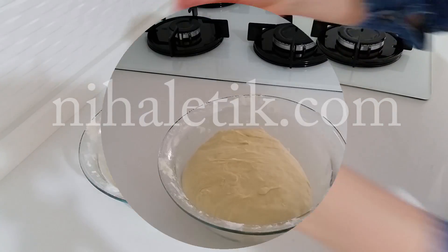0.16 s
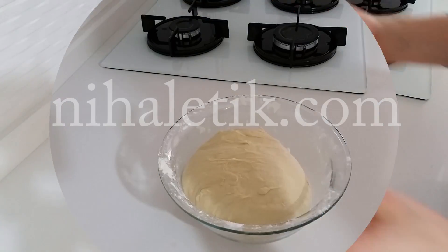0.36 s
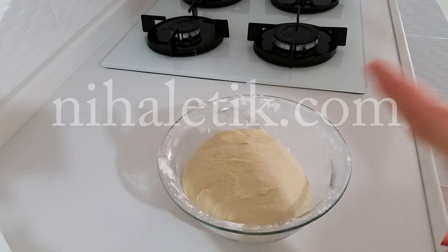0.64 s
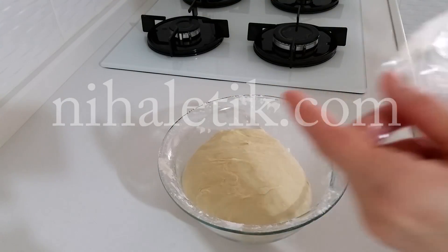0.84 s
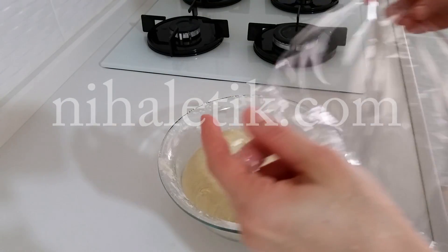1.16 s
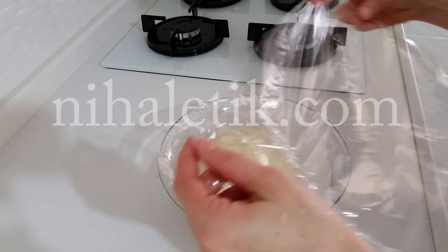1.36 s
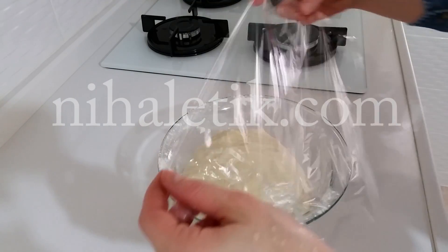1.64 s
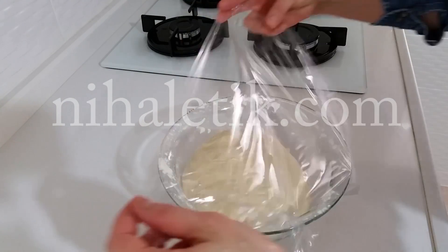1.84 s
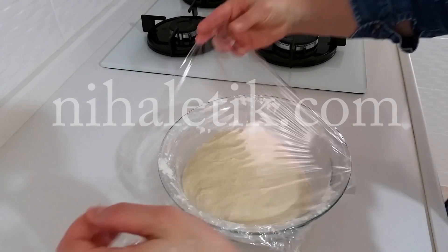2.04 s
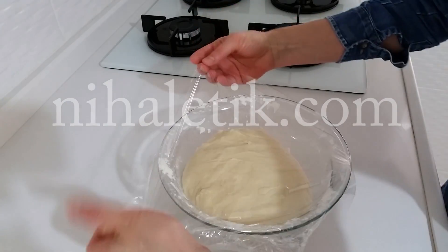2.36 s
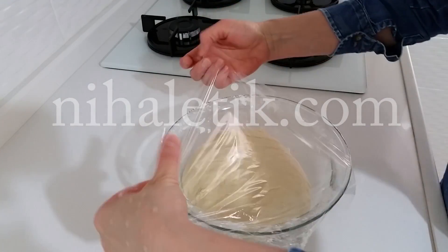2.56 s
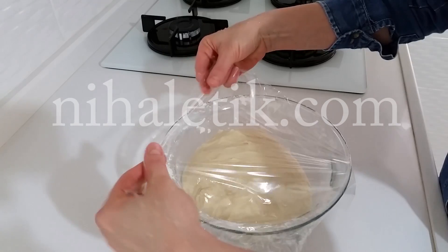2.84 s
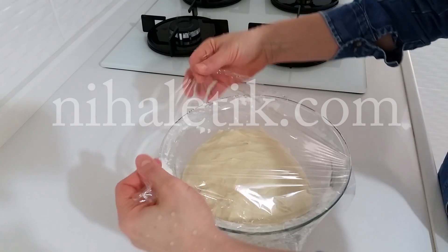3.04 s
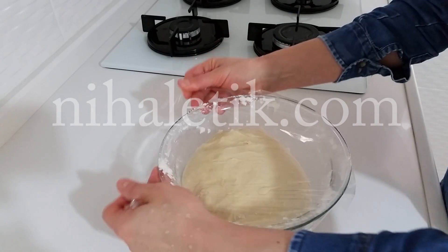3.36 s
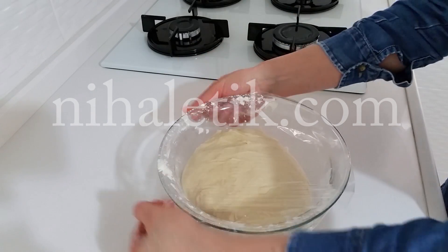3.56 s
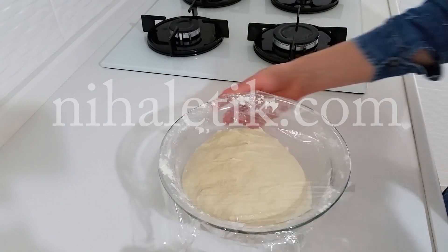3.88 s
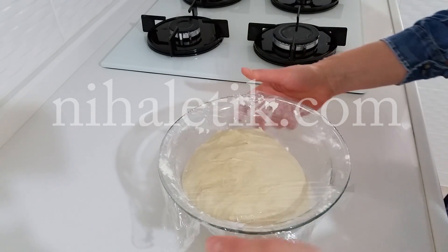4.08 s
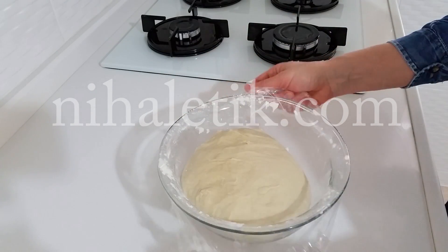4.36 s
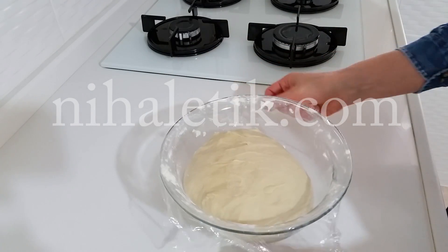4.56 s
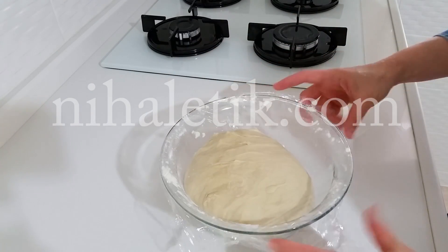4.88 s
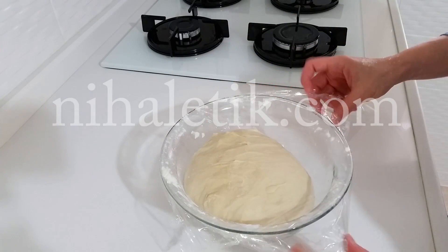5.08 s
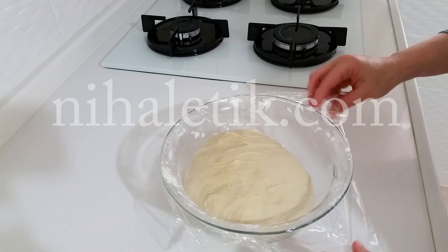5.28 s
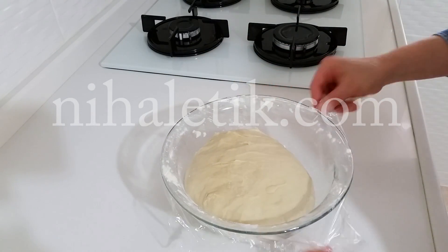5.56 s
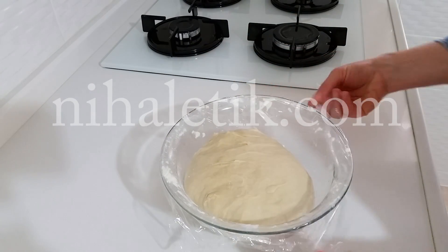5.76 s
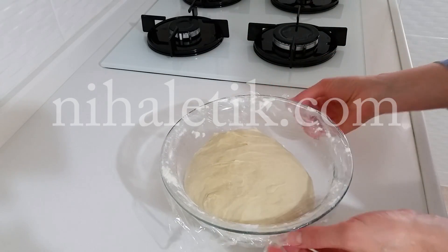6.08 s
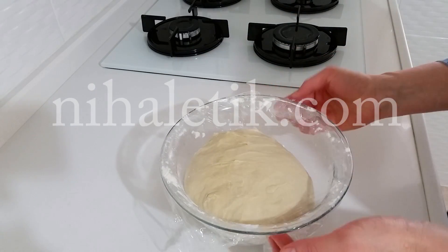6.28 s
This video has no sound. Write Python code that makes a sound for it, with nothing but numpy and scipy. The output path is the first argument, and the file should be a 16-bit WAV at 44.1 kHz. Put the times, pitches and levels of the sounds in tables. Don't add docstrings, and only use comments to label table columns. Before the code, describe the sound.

Plastic film crackles faintly, then snaps and pops sharply in bursts as hands stretch and press it over a glass bowl, above a low appliance hum.

```python
import sys
import numpy as np
from scipy import signal
from scipy.io import wavfile
from scipy.ndimage import uniform_filter1d

SR = 44100
rng = np.random.default_rng(int(sys.argv[2]) if len(sys.argv) > 2 else 0)


def bounce(signal):
    frames = np.transpose(np.atleast_2d(signal))
    limited = np.clip(frames, -1, 1)
    pcm = np.round(limited * 32767).astype(np.int16)
    wavfile.write(sys.argv[1], SR, pcm)


def to_linear_factor(level_db):
    exponent = np.asarray(level_db, float) / 20
    return 10 ** exponent


N = 283122
TAPS = 1024

# time in seconds, gain in dB.
ROOM_GAIN = [
    (0.0, -0.5),
    (0.68, -2.5),
    (2.27, 3),
    (3.2, 0.5),
    (3.84, 4.5),
    (4.08, -0.5),
    (4.5, 3.5),
    (4.95, 1.5),
    (5.29, 4),
    (6.42, 3.5),
]
# frequency in Hz, likeness (1 is identical).
LIKENESS = [(60, 1), (180, 0.68), (380, 0.73), (700, 0.12), (1650, 0.0076), (4970, 0.014), (15000, 0.028)]


def evened(x):
    return x / np.sqrt(np.mean(x ** 2) + 1e-20)


def read(points, hz):
    f, *columns = np.transpose(points)
    return np.array([np.interp(np.log(hz + 1), np.log(f + 1), c) for c in columns])


def along(rows):
    s, *columns = np.transpose(rows)
    return [np.interp(np.arange(N) / SR, s, c) for c in columns]


def add(mix, s, sound):
    part = mix[..., round(s * SR):][..., :sound.shape[-1]]
    part += sound[..., :part.shape[-1]]


def sides(pan_db):
    return to_linear_factor(np.array([pan_db / 2, -pan_db / 2]))


def causal(db):
    log_gain = np.log(to_linear_factor(np.maximum(db - db.max(), -100)))
    circle = np.concatenate([log_gain, log_gain[:, -2:0:-1]], axis=1)
    spectrum = np.exp(np.conj(signal.hilbert(circle, axis=1)))
    taps = np.fft.ifft(spectrum, axis=1).real[:, :TAPS]
    return 2 * taps / np.linalg.norm(taps)


def film_colours():
    # frequency in Hz, left level in dB, right level in dB.
    film = [(236, -72.5, -67), (497, -70.5, -82), (900, -69.5, -75), (1810, -73.5, -79), (3560, -74, -78),
            (4200, -72, -77), (5650, -86, -85.5), (6280, -89.5, -85.5), (7440, -90.5, -102),
            (8740, -75.5, -102), (10400, -72.5, -83), (13300, -76, -73.5), (14500, -78, -65.5),
            (15500, -78.5, -67.5)]
    # frequency in Hz, width in Hz, level in dB.
    hollow = [(535, 165, 2.5), (860, 76, 9), (1280, 140, -6), (1920, 190, -20), (2700, 330, -6)]
    hz = np.fft.rfftfreq(4 * TAPS, 1 / SR)
    octaves = np.log2((hz + 1) / 7200)
    colour_db = read(film, hz)
    treble_db = colour_db + 36 * np.minimum(octaves, 0)
    treble_db -= 400 * np.maximum(np.log2((hz + 1) / 16000), 0)
    body_db = colour_db - 40 * np.maximum(octaves, 0)
    body_db += 18 * np.minimum(np.log2((hz + 1) / 260), 0)
    body_db += 5.35 * sum(to_linear_factor(db / 2) / (1 + ((hz - f) / w) ** 2) for f, w, db in hollow)
    return causal(treble_db), causal(body_db)


def hands():
    # start in seconds, hold in seconds, crackle in dB,
    # rubbing on the bowl in dB above the crackle, left-right difference in dB.
    strokes = [(0.0, 0.2, -90, -15, -21), (0.87, 0.87, -80, -5.5, -7), (1.535, 0.29, -60, -13, -3.5),
               (1.998, 0.26, -54.5, -17, -1.5), (2.288, 0.73, -64, -12, 2.5),
               (2.867, 0.92, -64, -6.5, -0.5), (3.43, 0.2, -56.5, -15, 1.5), (3.987, 0.17, -72, 0, -2),
               (4.238, 0.1, -54.5, -10.5, -1), (4.467, .04, -46.5, -20, 3), (4.755, 0.18, -74, 4.5, -1),
               (4.93, 0.15, -54.5, -10, 0.5), (5.078, 0.07, -65, -9, 1), (5.23, 0.057, -48, -12, 2),
               (5.45, 0.42, -51, -14.5, 2), (5.652, 0.068, -41.5, -14, 1), (5.793, 0.15, -43.5, -13.5, 5.5),
               (5.904, 0.042, -52, -19, 3), (6.015, 0.48, -51.5, -13, 2)]
    # start in seconds, hold in seconds,
    # crackle in dB, rubbing in dB above the crackle, left-right difference in dB.
    slips = [(1.743, 0.061, -53.5, -16, 6), (3.692, 0.062, -44.5, -12.5, 2.5), (3.74, 0.026, -49.5, -28, 8),
             (3.81, 0.056, -36.5, -11, 7.5), (4.316, 0.14, -42.5, -10, 4.5), (4.503, 0.017, -45, -19, 4),
             (4.55, 0.074, -38, -10, 4.5), (4.716, 0.025, -49, -17, 3), (4.956, 0.022, -69, -3, -7),
             (5.07, 0.024, -48, -11, 4.5), (5.296, .02, -62, -14, -4), (6.298, 0.026, -46.5, -15.5, 6),
             (6.353, 0.031, -50.5, -19, -1), (2.313, 0.039, -66, -13.5, 0), (2.853, 0.026, -64, -24, 0),
             (2.111, 0.027, -49, -10, 9), (2.517, 0.02, -56.5, -15, 6), (3.019, 0.022, -53.5, -12, 3),
             (5.334, 0.077, -42, -15, 5)]
    start, hold, crackle_db, rub_db, pan_db = np.transpose([*strokes, *slips])[..., None]
    rise = np.repeat([188, 6000], [len(strokes), len(slips)])[:, None]
    fall = 194
    t = np.arange(0, N / SR + .01, .002)
    slope_db = np.maximum(rise * (start - t), fall * (t - start - hold))
    power = to_linear_factor(2 * (crackle_db - np.maximum(slope_db, 0))) + 1e-14
    total = power.sum(0)
    rub = (power * to_linear_factor(2 * rub_db)).sum(0)
    pan = (power * pan_db).sum(0) / total
    return along(np.transpose([t, 10 * np.log10(total), 10 * np.log10(rub), pan]))


def creases():
    # time in seconds, peak in dB, left-right difference in dB, length in ms.
    stiff = [(1.5205, -36, -3, 0.87), (1.7427, -24, 0, 0.5), (1.7551, -25, -6, 0.77),
             (1.9838, -35, -6, 0.88), (2.0683, -31, 1, 0.55), (2.1233, -28, -10, 0.56),
             (2.1311, -26, -4, 1.0), (2.3172, -32, -1, 0.79), (2.6817, -35, -3, 0.72),
             (2.8537, -31, -6, 0.73), (3.021, -29, -2, 2.5), (3.0231, -26, -8, 1.04),
             (3.2786, -41, -4, 0.94), (3.613, -33, 0, 1.25), (3.6752, -15, -1, 0.6), (3.6789, -26, -1, 2.5),
             (3.7452, -23, -1, 1.22), (3.7484, -24, 0, 1.15), (3.7936, -27, 10, 0.81),
             (3.8089, -21, 6, 2.5), (3.8114, -10, -4, 0.87), (3.8137, -19, 5, 2.5), (3.8781, -23, 4, 0.99),
             (4.3219, -30, -7, 1.23), (4.3365, -28, -10, 1.0), (4.3553, -22, -1, 1.08),
             (4.381, -18, -6, 1.72), (4.4188, -26, 7, 1.05), (4.4961, -27, 3, 0.57),
             (4.5512, -13, -9, 0.68), (4.5709, -21, -4, 0.84), (4.6431, -26, -11, 0.52),
             (4.7325, -30, -8, 2.5), (4.735, -20, -8, 0.81), (4.7379, -24, -2, 2.5),
             (4.9015, -34, -7, 0.69), (4.9683, -23, -8, 0.48), (5.0842, -23, -3, 0.67),
             (5.1097, -31, -12, 0.55), (5.2213, -28, 2, 1.25), (5.3036, -22, -8, 0.66),
             (5.3458, -24, -1, 0.94), (5.3543, -26, -8, 0.79), (5.5841, -31, -6, 0.52),
             (5.5969, -31, -5, 0.73), (5.6778, -19, 3, 0.51), (5.6969, -21, 7, 0.92),
             (5.8232, -30, -13, 0.62), (5.9276, -25, -2, 0.84), (5.9499, -30, -12, 0.62)]
    # time
    # in seconds, peak in dB, left-right difference in dB.
    ticks = [(0.8599, -53, -11), (0.8673, -49, -12), (1.0196, -57, -12), (1.0515, -56, -9),
             (1.2399, -53, -1), (1.3623, -59, -9), (1.3733, -55, -1), (1.3919, -53, 0), (1.3978, -54, -7),
             (1.4123, -50, -2), (1.4821, -54, -9), (1.523, -41, -1), (1.565, -43, -6), (1.5851, -38, -4),
             (1.5958, -43, -5), (1.6791, -42, -6), (1.6924, -42, -2), (1.7575, -31, 3), (1.7718, -33, -2),
             (1.774, -33, 1), (1.8721, -44, 6), (1.9739, -45, 1), (2.0109, -39, -7), (2.1025, -35, -4),
             (2.1339, -29, 1), (2.1506, -35, 12), (2.179, -34, -4), (2.227, -37, -3), (2.2906, -40, -7),
             (2.3205, -41, -3), (2.5288, -36, 3), (2.5308, -38, 6), (2.6219, -40, -1), (2.6418, -37, -7),
             (2.6859, -44, -6), (2.8048, -45, 5), (2.8558, -39, -1), (2.9316, -46, -4), (2.9898, -42, -9),
             (3.0167, -36, -3), (3.0255, -32, 0), (3.2424, -46, -4), (3.3156, -38, 3), (3.3185, -41, -5),
             (3.3806, -36, 2), (3.4658, -44, -5), (3.4801, -39, -3), (3.6153, -40, 5), (3.6825, -29, -3),
             (3.724, -31, -1), (3.7541, -27, -2), (3.7588, -30, -3), (3.7965, -34, 9), (3.8186, -20, -2),
             (3.8803, -28, 6), (4.2809, -36, -6), (4.3343, -30, -5), (4.3391, -31, -1), (4.3501, -28, -2),
             (4.384, -25, -3),
             (4.3871, -26, 1), (4.4209, -27, -6), (4.4448, -29, 1), (4.4843, -32, -2), (4.5126, -28, 6),
             (4.5212, -28, 0), (4.5533, -26, 1), (4.5559, -26, -6), (4.5761, -25, 3), (4.6304, -27, -8),
             (4.7404, -30, 4), (4.744, -34, -10), (4.966, -34, -8), (5.0208, -43, -9), (5.0334, -39, -5),
             (5.0626, -39, -6), (5.0807, -34, -8), (5.0934, -32, -10), (5.1908, -39, -7), (5.2031, -36, -5),
             (5.2087, -38, -8), (5.2256, -34, -3), (5.2279, -31, 0), (5.2477, -32, 3), (5.2729, -33, -6),
             (5.3057, -33, -1), (5.348, -30, 4), (5.3984, -34, 8), (5.4122, -30, -7), (5.4165, -33, 4),
             (5.4417, -33, -9), (5.5, -38, -10), (5.5035, -35, -7), (5.5286, -35, -3), (5.5494, -36, -4),
             (5.567, -37, -6), (5.6239, -32, -9), (5.669, -28, -5), (5.6741, -28, -4), (5.684, -25, -4),
             (5.6862, -28, -9), (5.691, -26, -3), (5.6992, -25, 2), (5.7035, -26, -4), (5.7097, -28, -3),
             (5.8057, -33, -6), (5.8134, -31, -13), (5.8344, -27, -1), (5.8569, -27, -3), (5.9298, -28, 0),
             (5.9344, -30, -5), (5.9805, -33, -6), (6.0471, -38, -5), (6.1734, -36, -5), (6.2062, -38, -10),
             (6.3077, -34, -6), (6.3356, -33, -1), (6.3663, -34, -6), (6.3684, -33, 1), (6.3728, -35, -2)]
    crackle_db, _, pan_db = hands()
    when, size = rng.random((120, 2)).T
    at = ((.01 + .98 * when) * N).astype(int)
    stray_db = crackle_db[at] + 7 - 1.5 * np.log(size)
    stray = zip(at / SR, stray_db, pan_db[at] - 4)
    snapping = [(*row, -22) for row in stiff]
    ticking = [(*row, .35, -34) for row in [*ticks, *stray]]
    return snapping + ticking


def snaps(treble, body):
    lead = .008
    crack_db = 11
    lift_db = 1.2
    crisp = .6
    echo_db = -4.5
    near, puffs, t = np.zeros((2, N)), np.zeros((2, N)), np.arange(800) / SR
    rows = creases()
    luck = rng.standard_normal((len(rows), 4, len(t)))
    for (s, db, pan_db, ms, rattle_db), (shared, a, b, size) in zip(rows, luck):
        u = (t - lead) * 1000 / np.clip(ms, .1, 6)
        swell = np.exp(-np.where(u < 0, -2 * u, 1.1 * u))
        clicks = swell * to_linear_factor(3.5 * size) * (0.6 * shared + 0.8 * np.array([a, b]))
        clicks[:, round(lead * SR)] += to_linear_factor(crack_db)
        crack = signal.fftconvolve(signal.lfilter([1, -crisp], 1, clicks), treble, axes=1)
        peak = abs(signal.hilbert(crack)).max(axis=1, keepdims=True)
        scale = to_linear_factor(db + lift_db) * sides(pan_db)[:, None] / peak
        rattle = signal.fftconvolve(clicks, body, axes=1)[:, :len(t)]
        add(near, s - lead, scale * crack)
        add(near, s - lead, to_linear_factor(db + rattle_db) * rattle / abs(rattle.mean(0)).max())
        energy = np.linalg.norm(clicks, axis=1, keepdims=True)
        add(puffs, s, to_linear_factor(echo_db) * scale * energy * to_linear_factor(5.5) * treble)
        add(puffs, s, to_linear_factor(db + rattle_db - 3.5) * body)
    return near, puffs


def grains(per_s, spread_db, clump_db):
    clumps = evened(uniform_filter1d(rng.standard_normal(N), size=90))
    size_db = spread_db * np.minimum(rng.exponential(1, N), 3.2) + clump_db * np.clip(clumps, -3, 2)
    size = to_linear_factor(size_db) * (rng.random(N) < per_s / SR)
    shared, a, b = rng.standard_normal((3, N))
    return evened(size * (0.61 * shared + 0.79 * np.array([a, b])))


def crackle(treble, body):
    crackle_db, rub_db, pan_db = hands()
    specks = signal.lfilter([1, -0.19], 1, grains(5000, 4.5, 3))
    fine = evened(specks) * to_linear_factor(crackle_db - 3.5) * sides(pan_db + 0.5)
    rub = grains(2500, 2.5, 4) * to_linear_factor(rub_db - 2)
    return (signal.oaconvolve(fine, treble, axes=1) + signal.oaconvolve(rub, body, axes=1))[:, :N]


def pops(body):
    # time in seconds, peak in dB, pitch in Hz.
    popping = [(2.125, -49.5, 1080), (3.0228, -45.5, 900), (3.564, -45.5, 1110), (3.613, -41, 910),
               (3.646, -68, 850), (3.6759, -29, 784), (3.6762, -32, 1960), (3.6828, -38, 1880),
               (3.749, -30.5, 1120), (3.811, -25.5, 1900), (3.8116, -32.5, 780), (4.3219, -43, 800),
               (4.3379, -37, 800), (4.3802, -33.5, 1650), (4.381, -33, 2800), (3.677, -41, 3300),
               (3.811, -37, 3400), (5.3037, -46, 2220), (5.0838, -45, 2400), (5.3536, -45, 2000),
               (4.5134, -33, 1170), (4.5212, -44, 517), (4.551, -27.5, 720), (4.551, -27, 1320),
               (4.6435, -38, 1170), (4.7354, -34, 1230), (4.7674, -44, 950), (5.0486, -48, 900),
               (5.082, -49.5, 1430), (5.3035, -47, 740), (5.3546, -39.5, 1070), (5.669, -44, 870),
               (5.697, -49, 600), (5.9277, -46, 900)]
    near, puffs, t = np.zeros((2, N)), np.zeros((2, N)), np.arange(-200, 600) / SR
    for s, db, hz in popping:
        cycles = t * hz
        swell = np.exp(-(cycles / np.where(cycles < 0, .6, 1.5)) ** 2)
        pop = to_linear_factor(db) * sides(9.0)[:, None] * swell * np.cos(2 * np.pi * cycles)
        add(near, s + t[0], pop)
        add(puffs, s + t[0], to_linear_factor(-11) * pop)
        add(puffs, s, to_linear_factor(db + 11.5) * body)
    return near, puffs


def bumps():
    # time in seconds, level in dB, pitch in Hz, t60 in seconds.
    knocks = [
        (3.565, -28.5, 103, 0.14),
        (4.619, -36.5, 93, 0.24),
        (2.132, -33, 174.4, 0.11),
        (4.384, -41.5, 328, 0.17),
        (4.513, -21, 534, 0.037),
        (4.553, -46, 437, 0.075),
    ]
    out, t = np.zeros(N), np.arange(SR // 3) / SR
    for s, db, hz, t60 in knocks:
        onset = 1 - np.exp(-t / 0.013)
        add(out, s, to_linear_factor(db - 60 * t / t60) * onset * np.sin(2 * np.pi * hz * t))
    return out


def kitchen(x):
    # frequency in Hz, t60 in seconds.
    decay = [(300, 0.21), (800, 0.27), (2100, 0.25), (5500, 0.22), (10000, 0.079), (15000, 0.15)]
    out, t = np.zeros((2, N)), np.arange(N) / SR
    slots = np.arange(120, SR // 2 - 20, 12)
    for k in range(3):
        taps = np.zeros((2, SR // 2))
        at = slots + rng.integers(0, 12, (2, len(slots)))
        np.put_along_axis(taps, at, rng.choice([-1., 1.], at.shape), 1)
        hz, s, z = signal.stft(taps, SR, nperseg=128)
        same = np.clip(4.6 * read(LIKENESS, hz)[0], 0, 1)[:, None]
        z[1] = same * z[0] + np.sqrt(1 - same ** 2) * z[1]
        dying = to_linear_factor(-60 * s / read(decay, hz)[0][:, None])
        tail = signal.istft(z * dying, SR, nperseg=128)[1]
        turn = np.sqrt(2 / 3) * np.cos(np.pi * (7 * t + k / 3))
        out += signal.fftconvolve(x * turn, tail / np.linalg.norm(tail[0]), axes=1)[:, :N]
    return out


def motor():
    # frequency in Hz, level in dB.
    tones = [(178.5, -58.5), (339.1, -63.5)]
    # time in seconds, level in dB.
    load = [(0.0, -69), (0.12, -51.5), (1.14, -74), (1.34, -56), (1.68, -61), (2.13, -49), (3.36, -71.5),
            (3.48, -50.5), (3.54, -66.5), (3.9, -47), (3.99, -79.5), (4.94, -50), (5.11, -71),
            (5.22, -47.5), (5.97, -58), (6.02, -43.5), (6.26, -59.5), (6.42, -50)]
    waver = [evened(uniform_filter1d(uniform_filter1d(v, size=9000), size=9000))
             for v in rng.standard_normal((3, N))]
    load_db = along(load)[0]
    swells_db = load_db - load_db.mean(), along(ROOM_GAIN)[0] + 0.9 * waver[2]
    out = np.zeros(N)
    for (hz, db), swell_db, drift in zip(tones, swells_db, waver):
        phase = 2 * np.pi * np.cumsum(hz + 1.48 * drift) / SR
        out += to_linear_factor(db + swell_db) * np.sin(phase)
    return out


def background():
    # frequency in Hz, left level in dB, right level in dB.
    floor = [(25, -105, -90), (44, -100.5, -99.5), (83.4, -76, -78.5), (225, -86, -89.5),
             (715, -97.5, -99.5), (990, -108.4, -110.8), (2380, -118.7, -118.0), (2660, -103, -112),
             (3020, -105, -113), (3732, -87, -106.9), (5170, -120.2, -122.3), (6070, -131, -131),
             (12600, -126.3, -127.6), (14000, -114.4, -111.6)]
    # frequency in Hz, width in Hz, level in dB over the noise.
    hum = [(44, 7.7, 15.5), (89.5, 37, -3), (145.7, 16.3, 7.5), (180.8, 19, 8), (335, 10.6, 9.5),
           (464.4, 22, 9), (540, 8.4, -7), (2890, 230, 9)]
    frames, hz = N // 2048 + 5, np.fft.rfftfreq(8192, 1 / SR)
    a, b, c, d = rng.standard_normal((frames, len(hz), 4)).T
    same = np.clip(read(LIKENESS, hz)[0], -1, .9)[:, None]
    left = a + 1j * b
    z = np.array([left, same * left + np.sqrt(1 - same ** 2) * (c + 1j * d)])
    lines = 1 + sum(to_linear_factor(2 * db) / (1 + (2 * (hz - f) / w) ** 2) ** 2 for f, w, db in hum)
    z *= (to_linear_factor(read(floor, hz)) * np.sqrt(lines) * hz ** 2 / (hz ** 2 + 30 ** 2))[..., None]
    low = 1 / (1 + (hz / 1500) ** 8)[:, None]
    rumble, whistle = (signal.istft(z * share, nperseg=8192, noverlap=6144)[1][:, :N]
                       for share in (low, 1 - low))
    gain_db = along(ROOM_GAIN)[0]
    rumble = to_linear_factor(-54 + gain_db) * rumble / np.std(rumble.mean(0))
    return rumble + to_linear_factor(-65 + 1.26 * gain_db) * whistle / np.std(whistle.mean(0))


def scene():
    treble, body = film_colours()
    snap, puffs = snaps(treble, body)
    pop, thuds = pops(body)
    fine = crackle(treble, body)
    wet = kitchen(to_linear_factor(-1) * puffs + thuds + to_linear_factor(.5) * fine)
    return snap + pop + to_linear_factor(-2.5) * fine + wet + bumps() + background() + motor()


def starve(x):
    hz, _, z = signal.stft(x, SR, nperseg=1024)
    band_db = 10 * np.log10(uniform_filter1d(abs(z) ** 2, size=6, axis=1).mean(0) + 1e-20)
    treble_db = uniform_filter1d(band_db[hz > 9000].max(0), size=3)
    mask_db = np.maximum(treble_db - 30, -122)
    keep = np.clip((band_db - mask_db) / 2, .02, 1)
    return signal.istft(z * np.where(hz[:, None] > 4500, keep, 1), SR, nperseg=1024)[1][:, :N]


def band_limit(x):
    return signal.sosfilt(signal.butter(12, 16810, fs=SR, output="sos"), x)


def record(dry):
    t = np.arange(N) / SR - 0.2306
    step = 0.007 * (t > 0) * np.exp(-abs(t) / 0.0014)
    below, wider = (signal.oaconvolve(dry + step, signal.firwin(801, hz, window=("kaiser", 10), fs=SR)[None],
                                      "same") for hz in (15830, 16750))
    top = wider - below
    quick, slow = (abs(uniform_filter1d((top ** 2).mean(0), size=n)) for n in (128, 3000))
    sudden = uniform_filter1d(1.0 * (quick > 7 * slow), size=400) > 0
    leak = to_linear_factor(-19) * uniform_filter1d(1.0 * sudden, size=128) * top
    return band_limit(starve(below) + leak - .0005)


dry = scene()
out = record(dry)
bounce(out)
```